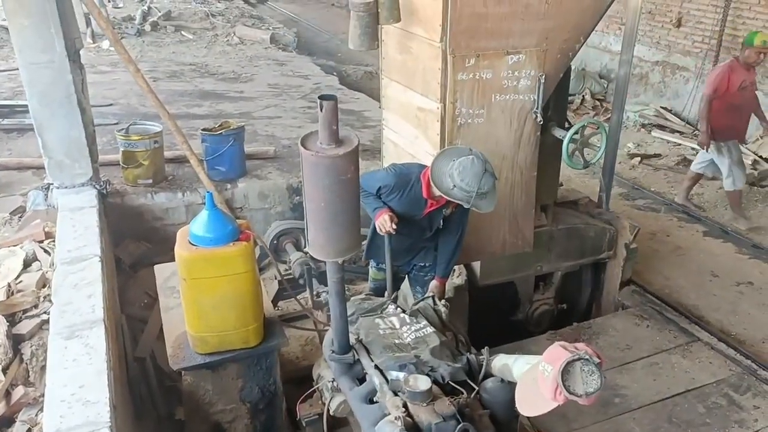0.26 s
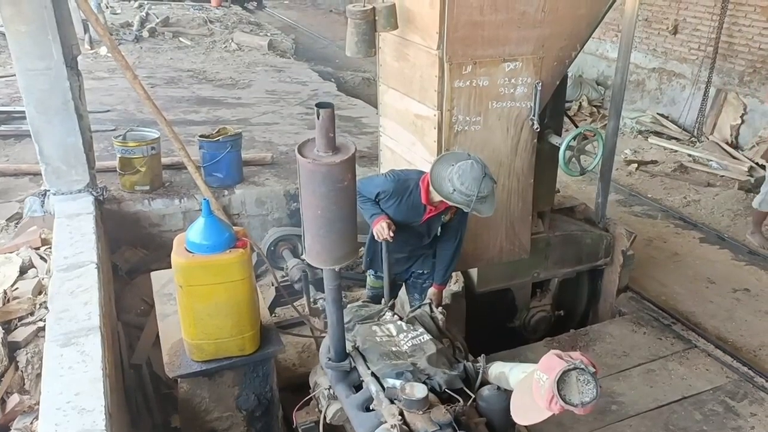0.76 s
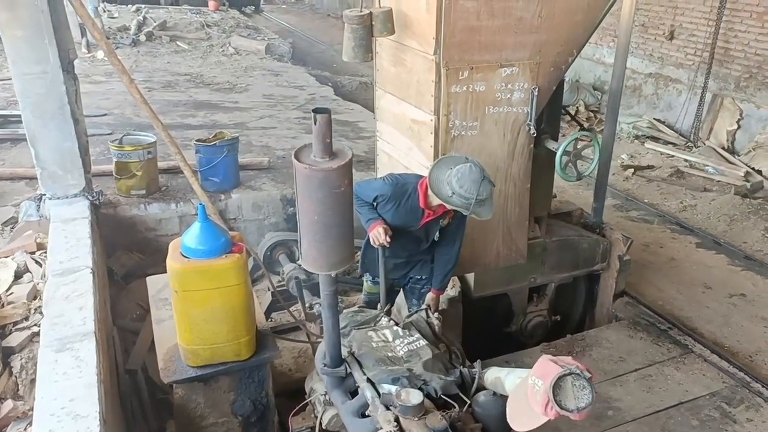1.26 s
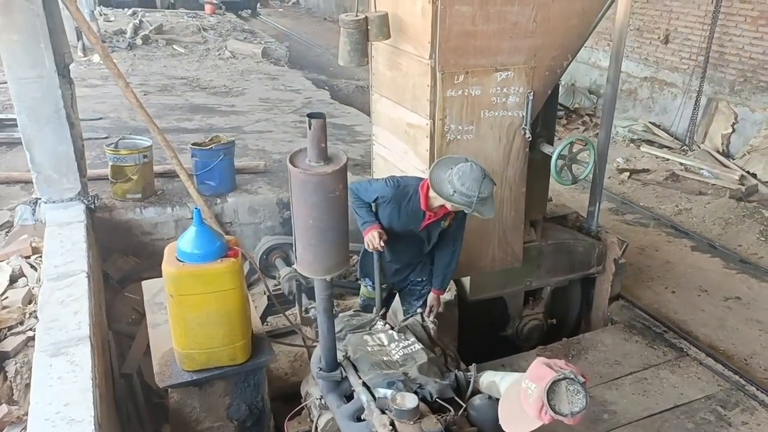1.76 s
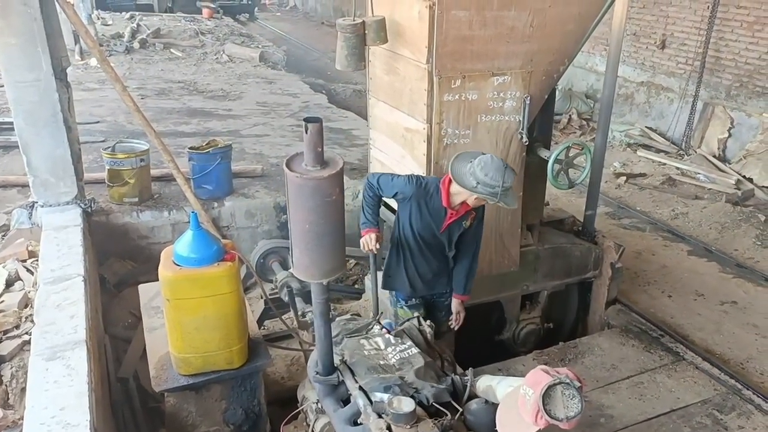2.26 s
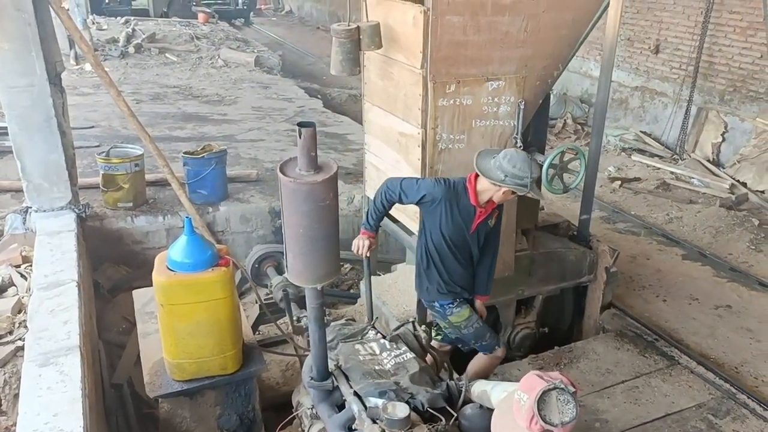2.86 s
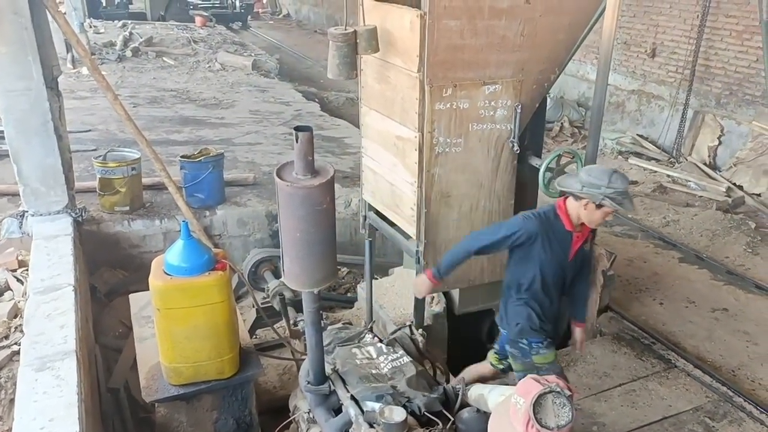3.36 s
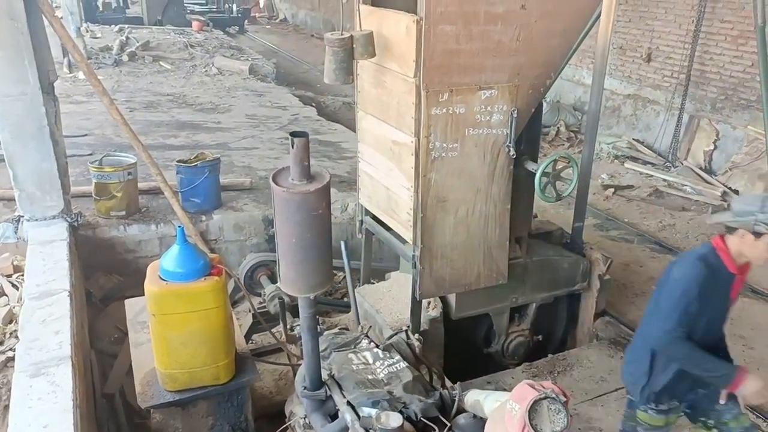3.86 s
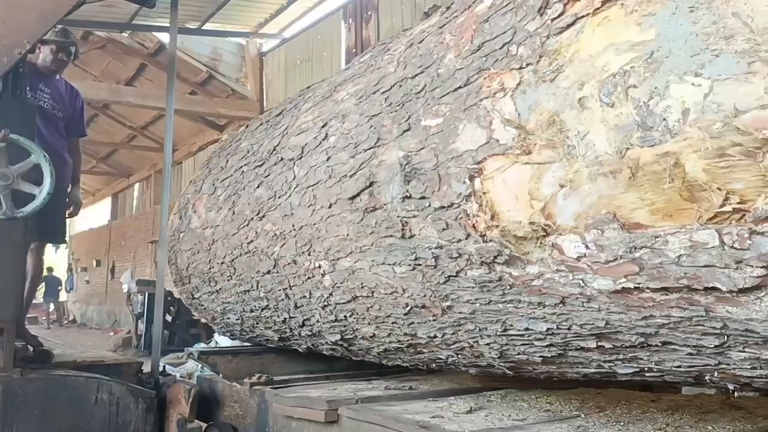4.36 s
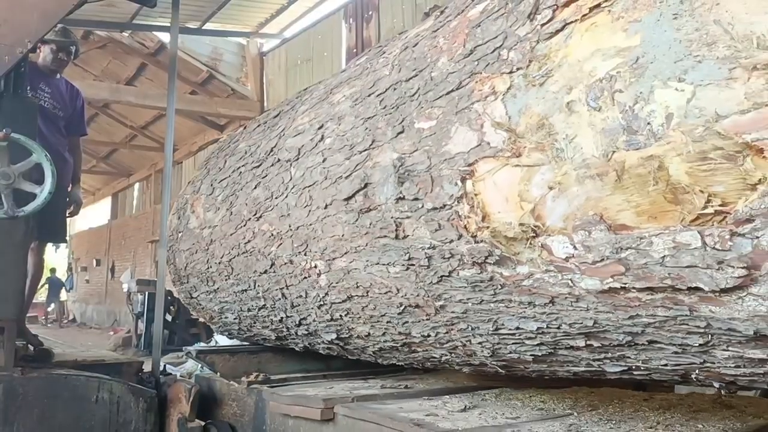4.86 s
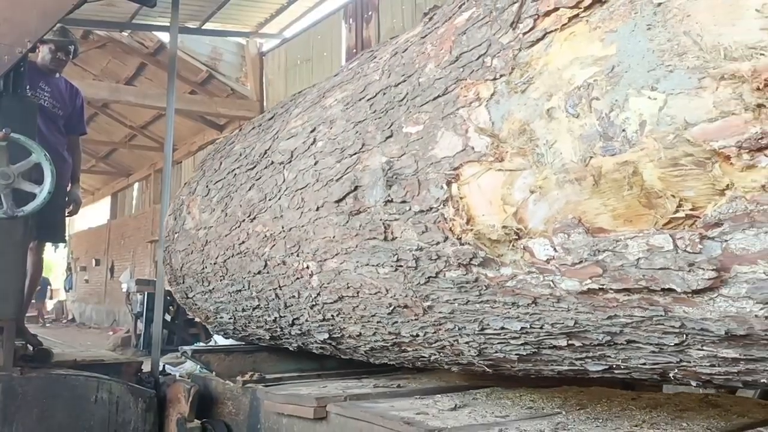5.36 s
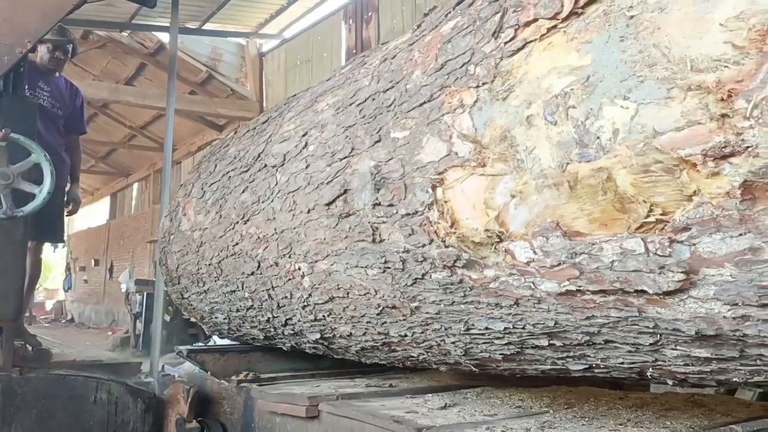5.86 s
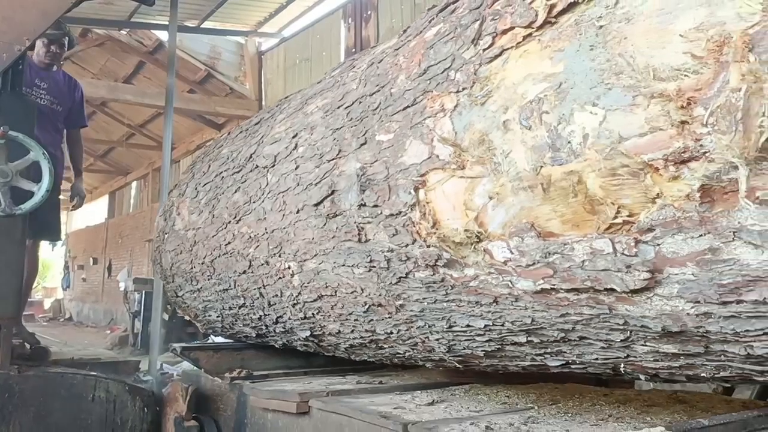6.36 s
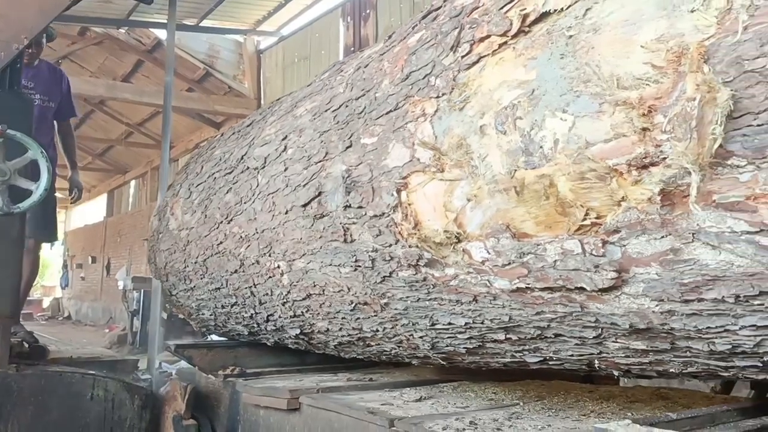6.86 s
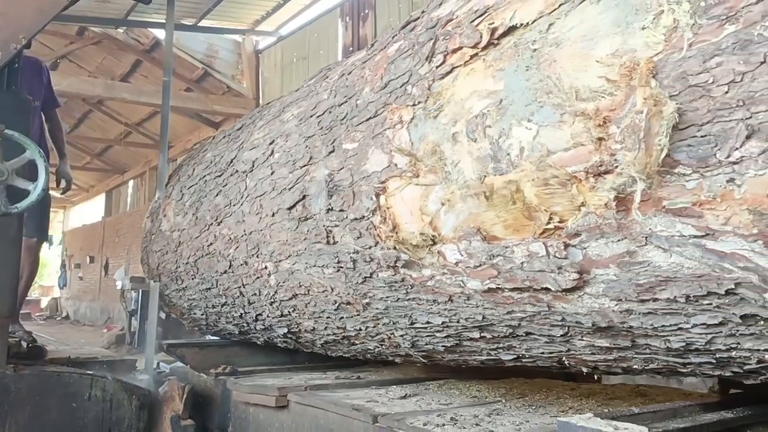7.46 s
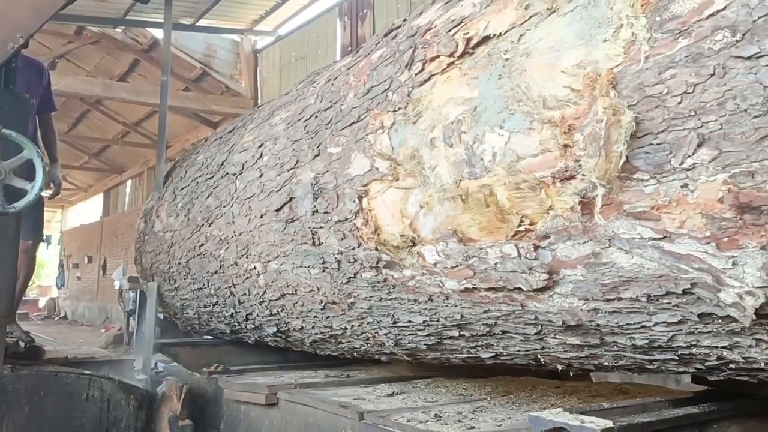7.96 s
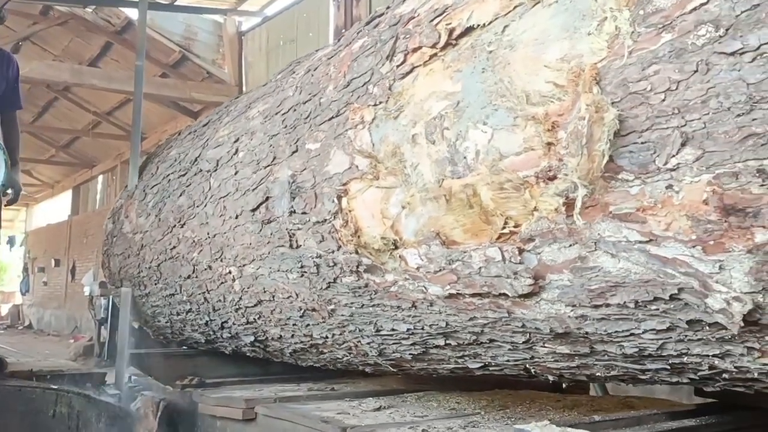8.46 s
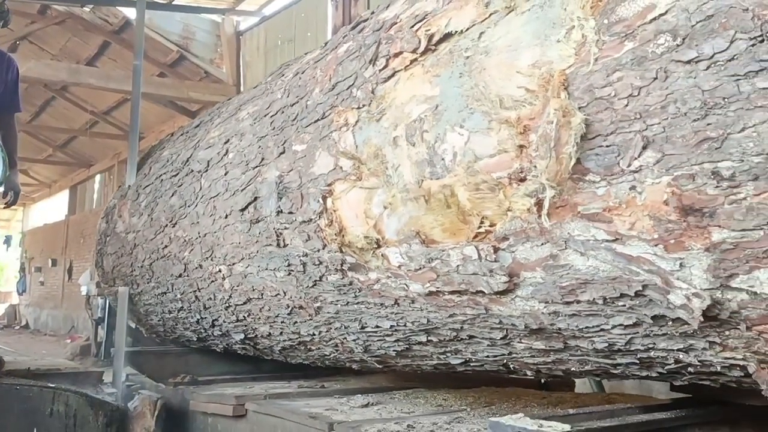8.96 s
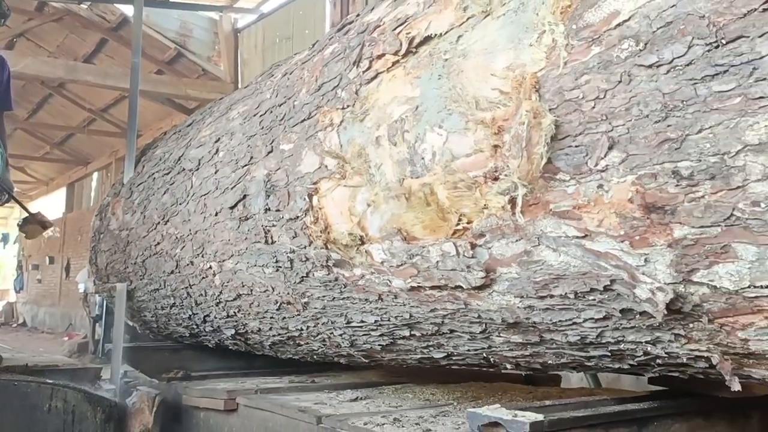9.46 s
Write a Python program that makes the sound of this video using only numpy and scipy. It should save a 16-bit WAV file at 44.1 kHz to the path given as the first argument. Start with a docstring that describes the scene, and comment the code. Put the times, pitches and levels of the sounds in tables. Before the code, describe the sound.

From 0 s a six-cylinder diesel idles very close, a smooth, fast exhaust throb of about 67 beats a second covered in hard metallic knocks, ticking valve gear and a rough roar. From about 1.5 to 2.7 s a slipping belt squeals near 3.8 kHz in tiny rapid chirps; the engine sags briefly around 2.2 s. At 2.5 s the throttle opens and the speed climbs to a harsher, blurred roar with fan hum until 4.5 s. A quick cut then places us by the log: the engine is steady, duller and across the shed, with belt-wheel hum and faint blade hiss. At 4.8 s teeth lightly brush bark. At 5.5 s the saw bites: a bright hiss flares, then settles and thickens, pulsing with passing teeth, with singing tones and short whines. A low, surging band drone grows to the end near 9.7 s as the engine slows slightly.

```python
"""A six-cylinder diesel drives a band saw in an open shed. Beside its silencer we first hear it idle: each
firing gives a smooth exhaust throb and a burst of ringing, noisy knocks. A thin metal part chirps in short
pulses, the engine sags, then it is throttled up and roars. Next we listen from the log carriage: the engine is
farther off, the band runs in air and brushes the bark. Then it bites: filtered noise makes the hiss, tones at
multiples of the tooth rate sing, the band drones, and the load pulls the speed down a little."""
import sys
import numpy as np
from scipy import signal
from scipy.fft import rfft, irfft, next_fast_len
from scipy.io import wavfile
from scipy.ndimage import uniform_filter1d, map_coordinates

SR = 44100
rng = np.random.default_rng(int(sys.argv[2]) if len(sys.argv) > 2 else 0)


def output_pcm(signal):
    """Save a mono or channel-first signal as 16-bit PCM at the path in sys.argv[1].

    Samples are clipped to [-1, 1] before scaling.
    """
    pcm = np.clip(np.atleast_2d(signal).T, -1, 1) * 32767
    wavfile.write(sys.argv[1], SR, np.round(pcm).astype(np.int16))


N = 427769
T = np.arange(N) / SR  # time of every sample, s

# Tones from unequal cylinders; the three idle-to-throttle levels are for beside the engine and the carriage:
# multiple of the four-stroke cycle, idle level/dB, throttled-up level/dB (both played 1 dB lower), carriage level/dB
UNEVEN_TONES = [(5, -39, -53, -53), (8, -47, -38, -43), (9, -41, -26.5, -38.5), (10, -42, -27.5, -42),
                (11, -41, -39, -50), (14, -36.5, -39, -55), (15, -36.5, -39, -42), (16, -35, -37, -41),
                (18, -33.5, -28.5, -42), (19, -46, -30, -47), (20, -40, -27.5, -41), (22, -37.5, -34, -53),
                (24, -32.5, -38, -48), (26, -45, -35, -44), (27, -50, -41, -40), (28, -58, -32, -45),
                (43, -50, -35, -54), (50, -39, -45, -50), (51, -55, -48, -45), (54, -35, -43, -51),
                (55, -37.5, -45, -52), (78, -40.5, -42, -55), (80, -38, -46, -58), (84, -41, -35, -53)]
# Strength of each cylinder's knock, in firing order: level/dB
CYLINDERS_DB = [.3, 1.2, -1.3, 0, 1.2, -.5]
# How alike the knocks are from cycle to cycle: f/Hz, share of the power that repeats
REPEATS = [(200, .03), (450, .36), (900, .42), (1400, .28), (3000, .08), (6000, .02)]
# Belt-driven fan beside the engine: multiple of the firing rate, idle level/dB, throttled-up level/dB
FAN_TONES = [(2.621, -43, -29), (7.863, -46, -37)]
# Hums heard at the carriage, the engine's fan (2.621) and the belt wheels: multiple of the firing rate, level
# before the cut/dB, change by the end/dB
WHEEL_TONES = [(2.621, -35.5, 1.5), (4.46, -36.5, -5.5), (5.87, -45.5, 8.5), (6.3, -50, 10),
               (8.5, -38, -10), (8.76, -42, 1), (10.1, -40, 2.5), (15.05, -42, -9)]

# Colour of each noise: f/Hz, level/dB (only the shape counts)
IDLE_SPECTRUM = [(200, -19), (500, -6), (900, -3.5), (1500, -11.5), (2400, -0.8), (3000, -4.5),
                 (3700, -6.5), (4600, -7), (6200, -10.5), (7200, -22.5), (9600, -12.5), (12000, -17),
                 (15500, -21.5)]  # knock at idle
RACING_SPECTRUM = [(400, -10), (900, 7), (1400, -3.5), (1800, 4), (2300, 2.5), (3000, -2.5), (4400, -6.5),
                   (6000, -9.5), (7200, -17), (9500, -12.5), (11200, -12), (13000, -20), (15500, -19)]  # knock at high speed
ROAR_SPECTRUM = [(25, -8), (90, 1), (170, 1), (250, 2.5), (370, -1.5), (470, 0.5), (600, 1.5), (1050, -2),
                 (1450, -6.5), (2200, -10), (3200, -11.5), (7000, -22), (11000, -24), (15500, -26)]  # roar of the shaken covers
TICK_SPECTRUM = [(1500, -30), (2400, -9), (2950, -12), (3500, 4), (3850, -2), (4200, -4), (4900, -13),
                 (7000, -20), (12000, -26)]  # valve gear
SHED_SPECTRUM = [(25, -22), (110, -8.5), (180, -9.5), (260, -12), (330, -10.5), (450, -8.5), (600, -10.5),
                 (930, -13), (1350, -17.5), (2100, -20), (3300, -22), (7000, -34), (9400, -34),
                 (15500, -52)]  # engine across the shed
KERF_SPECTRUM = [(900, 4.5), (1700, -1), (3000, 4.5), (4200, 2.5), (5600, -0.5), (6800, -4.5), (8600, -4),
                 (10200, 0.5), (12000, 0), (13000, -1.5), (14200, -8), (15500, -14)]  # hiss of the teeth
DRONE_SPECTRUM = [(25, -27), (60, -15), (105, -5.5), (150, -29), (182, -2), (210, 8), (230, 2), (255, -25),
                  (500, -49)]  # drone of the band

# Resonances: f/Hz, width/Hz, lift/dB
ROCKER_MODES = [(2320, 150, 1), (2560, 70, 2.5), (3150, 220, -4), (3380, 70, 4), (3380, 80, 3.5),
                (3630, 70, 6), (3810, 130, 4.5), (4150, 70, 2.5), (4300, 60, 6)]  # thin metal that rattles at idle
COVER_MODES = [(600, 50, 2.5), (870, 50, 2.5), (1200, 80, 4.5), (1764, 45, 5.5), (2320, 210, 5)]  # engine covers
FRAME_MODES = [(593, 27, 4.5), (1038, 70, 7), (1175, 70, -5), (1610, 44, 6.5), (1880, 310, 4.5),
               (2100, 88, 5.5), (8050, 140, 1)]  # engine heard at the carriage
BLADE_MODES = [(1890, 150, 7), (2093, 110, 8.4), (2900, 300, 2.7), (5660, 79, 2), (7950, 130, 4),
               (9700, 120, 5.5), (12950, 200, 3)]  # saw blade

# Stereo width, beside the engine and at the carriage: f/Hz, side-to-mid level/dB
NEAR_WIDTH = [(60, -10), (110, -19), (200, -13.5), (380, -12.5), (700, -8.5), (1290, -2.5), (2380, -2.5),
              (4400, -1.5), (8120, 0), (15000, 0.5)]
FAR_WIDTH = [(60, -27), (200, -33), (400, -9), (700, -1), (1300, -3), (3000, 0.5)]
# Stereo balance at the same two places: f/Hz, left-to-right level/dB
NEAR_LEAN = [(200, -1.5), (380, 2.5), (1290, -2.5), (2400, 1), (3600, -3.5), (5000, 0), (6200, -10.5),
             (7700, 5.5), (11000, 1), (13500, -8)]
FAR_LEAN = [(200, -0.5), (1290, -1), (2400, 2), (3200, -4.5), (4200, -4.5), (6200, -3), (7700, 11.5),
            (11000, 1), (13500, -6.5)]

# Pulsing chirp of a thin metal part that rattles, one short pulse per firing: t/s, level/dB
SQUEAL = [(0, -70), (1.45, -54), (1.6, -40), (2.1, -42), (2.2, -33.5), (2.42, -34), (2.56, -35.5),
          (2.68, -41), (2.78, -70)]
# Its loudest chirps: t/s, peak level/dB, f/Hz
CHIRPS = [(1.747, -25, 3790), (1.911, -28, 3820), (2.152, -24.5, 3790), (2.212, -26, 3950),
          (2.229, -26.5, 3970), (2.305, -25.5, 3820), (2.350, -24, 3840), (2.381, -25, 3830),
          (2.513, -27, 3860)]

# Singing teeth: multiple of the tooth rate, level against the hiss/dB (song then mixed lower), wait after bite t/s
TOOTH_TONES = [(4, -16, 1.5), (6, -17, .55), (7, -19, .55), (8, -17, .72), (9, -16, .33), (10, -20, .1),
               (11, -20, .25), (12, -20, .4), (17, -17, 0), (20, -20, .15), (21, -16.5, 0), (22, -20, 0),
               (23, -20, 0), (24, -23, 0), (25, -26, 0), (26, -24, 0), (28, -21, 0), (29, -26, 0)]
# Short whines on one tooth tone: t/s, multiple of the tooth rate, peak against the hiss/dB (mixed lower),
# half length t/s
WHINES = [(5.97, 9, -9, .09), (6.27, 8, -11, .08), (6.5, 8, -10.5, .12), (6.72, 9, -12, .1),
          (7.2, 4, -8, .08), (7.32, 8, -10, .15), (7.52, 9, -12, .14), (7.65, 4, -10, .1),
          (8.25, 8, -9.5, .09), (8.25, 4, -10, .18), (8.73, 8, -7, .11), (9.15, 8, -10.5, .2),
          (9.33, 4, -9, .1), (9.45, 9, -8.5, .17)]
# Stretches where the teeth stand proud: place after the weld/laps, lift/dB, half length/laps
PROUD = [(0, 3.7, .045), (.32, 1.6, .06), (.48, 2.9, .045), (.58, 1.3, .05), (.7, .8, .04)]
# Surges of the band's drone: t/s, peak level/dB, half length t/s, f/Hz, glide/(Hz per s)
SURGES = [(6.4, -36, .075, 186, 92), (6.6, -35, .12, 213, 0), (6.86, -33, .06, 206, 62),
          (7.38, -32, .14, 212, -18), (7.53, -30, .06, 215, 40), (7.79, -25.5, .07, 207, 99),
          (7.86, -30, .09, 180, 0), (8.16, -31.5, .1, 180, -4), (8.33, -29, .08, 211, 181),
          (8.6, -31, .13, 180, 0), (8.7, -31, .1, 214, -40), (8.92, -29.5, .1, 213, 0),
          (9.22, -30.5, .09, 178, -22), (9.4, -27.5, .1, 208, 48), (9.62, -27.5, .07, 218, 39)]

JUMP_S, JUMP_FADE_S = 4.475, 0.039  # when we move from engine to carriage; length of the crossfade
# engine speed in firings per second: idle, the goal of the open throttle, at the carriage before the cut
IDLE_HZ, OPEN_HZ, SAWING_HZ = 67.25, 78.7, 70.3
SAG_HZ, DROOP_HZ = 2.3, 1.65  # speed lost taking up the belt, and in the full cut
BELT_S, SAG_S = 2.2, .15  # middle of the sag, and its half length
THROTTLE_S, SPIN_UP_S = 2.48, 1.0  # the throttle opens; the lag with which the flywheel follows
# the firing tone is loudest at one speed and falls away on both sides
TUNED_HZ, THROB_DB, DETUNE_DB_PER_HZ = 69.7, -14, 0.57
# its octave fades with speed, and steeply once the silencer starts to block it
OCTAVE_DB, OCTAVE_DB_PER_HZ, BLOCKED_HZ, BLOCKED_DB_PER_HZ = -15.5, 0.46, 74.5, 2
CRACK_S = .025  # crack that opens a knock: time to fall 60 dB
# levels beside the engine, before the rise that comes with the throttle
IDLE_KNOCK_DB, RACING_KNOCK_DB, KNOCK_RISE_DB = -23, -21, 2
ROAR_DB, ROAR_RISE_DB = -19, 1.7
# valve gear at idle: level, time for a tick to fall 60 dB at idle speed, scatter of strength
TICK_DB, TICK_T60_S, TICK_SCATTER_DB = -34, .022, 2.0
# metal rattle: pitch, half length of a chirp, depth of flutter, fast and slow pitch scatter
SQUEAL_HZ, CHIRP_S, SQUEAL_FLUTTER_DB = 3830, .006, 2.5
SQUEAL_JITTER_HZ, SQUEAL_DRIFT_HZ = 50, 15
# engine at the carriage: levels before the cut, and how far and how fast they dip at the bite
FAR_THROB_DB, THROB_DIP_DB = -23, 1
FAR_DIN_DB, DIN_DIP_DB, DIP_S = -21.5, 4, 0.21
FREE_BLADE_DB = -36  # the band running in air
GRAZE_S, GRAZE_LENGTH_S, GRAZE_DB = 4.8, 0.054, -33  # teeth brush the bark: moment, half length, level
# the cut: the teeth bite, the hiss flares and settles, and the kerf reaches its full depth
BITE_S, BITE_ATTACK_S, SETTLE_S, DEEPEN_S = 5.49, 0.09, 0.78, 2.6
HISS_DB, FLARE_DB = -28, 5  # settled level, and the flare above it
TEETH_PER_FIRING, TEETH_ON_BAND = 6.703, 140
WELD_S = 7.412  # a moment when the weld passes
SING_RISE_S, SING_FADE_DB, SING_FADES_PER_S = .12, 1.5, 5
CATCH_DB, CATCH_S = 5.5, .45  # extra level as a tone catches, and the lag with which it settles
DRONE_DB, DRONE_DB_PER_S = -33, 0.77  # level up to the bite, and its growth afterwards
TOP_HZ = 15500  # microphone band limit


def amp(db):
    """Turn decibels into gain."""
    return 10 ** (np.asarray(db) / 20)


def unit(x):
    """Scale to an rms of 1."""
    return x / np.sqrt(np.mean(x ** 2) + 1e-20)


def along(points, hz):
    """Read a (frequency, value) table on a log frequency axis."""
    f, v = np.transpose(points)
    return np.interp(np.log(hz + 1), np.log(f + 1), v)


def wobble(rate, size=64):
    """A smooth random curve with rate knots a second."""
    knots = rng.standard_normal(int(N * rate / SR) + 4)
    coarse_t = T[::size]
    return np.interp(T, coarse_t, map_coordinates(knots, [coarse_t * rate]))


def swell(at_s, half_s):
    """A smooth rise to 1 and fall around one moment."""
    return np.exp(-((T - at_s) / half_s) ** 2)


def approach(start_s, lag_s):
    """From 0 toward 1, quickly at first, after a start time."""
    return 1 - np.exp(-np.maximum(T - start_s, 0) / lag_s)


def filtered(x, response):
    """Shape x by a gain that depends on frequency."""
    m = next_fast_len(N + 8192)
    return irfft(rfft(x, m) * response(np.fft.rfftfreq(m, 1 / SR)), m)[..., :N]


def body(x, spectrum, modes, width, lean):
    """Pass two noises through a resonant body as mid and side; the final mid has rms 1."""
    def colour(hz):
        lift = sum(db / (1 + (2 * (hz - f) / w) ** 2) for f, w, db in modes)
        mid_and_side = np.array([np.ones_like(hz), amp(along(width, hz))])
        return amp(along(spectrum, hz) + lift) * mid_and_side

    mid, side = filtered(x, colour)
    left_right = np.array([mid + side, mid - side])
    pair = filtered(left_right, lambda hz: amp(np.outer([.5, -.5], along(lean, hz))))
    return pair / np.std(pair.mean(axis=0))


def patchy(x, depth_db, size=7):
    """Narrow bands flare and fade at random for some tens of milliseconds."""
    z = signal.stft(x, nperseg=1024)[2]
    field = uniform_filter1d(rng.standard_normal(z.shape[1:]), size=3, axis=0)  # smooth over frequency
    field = uniform_filter1d(field, size=size, axis=1)  # smooth over time
    return signal.istft(z * amp(depth_db * unit(field)), nperseg=1024)[1][:, :N]


def off_axis(pair, left_lead_s):
    """Sound from one side reaches one microphone first."""
    return filtered(pair, lambda hz: np.exp(1j * np.pi * left_lead_s * np.outer([1, -1], hz)))


def tone(turns, waver):
    """A sine of rms 1 whose phase wanders a little."""
    return np.sqrt(2) * np.sin(2 * np.pi * (turns + rng.random()) + waver * wobble(9))


def glides(rows, waver_hz):
    """Short tones that swell and fade while their pitch slides and wavers."""
    out = np.zeros(N)
    for s, db, half_s, hz, slide in rows:
        on = abs(T - s) < 3 * half_s
        since = T[on] - s
        turns = np.cumsum(hz + slide * since + waver_hz[on]) / SR + rng.random()
        out[on] += amp(db) * np.exp(-(since / half_s) ** 2) * np.sqrt(2) * np.sin(2 * np.pi * turns)
    return out


def kerf_depth():
    """0 to 1 as the blade works into the rounded end of the log."""
    return np.sin(np.pi / 2 * np.clip((T - BITE_S) / DEEPEN_S, 0, 1))


def engine_speed():
    """Firings per second: idle, a sag under the belt, the run-up, then a droop that follows the cut's depth."""
    sag = SAG_HZ * swell(BELT_S, SAG_S)
    run_up = (OPEN_HZ - IDLE_HZ) * approach(THROTTLE_S, SPIN_UP_S)
    return np.where(T < JUMP_S, IDLE_HZ - sag + run_up, SAWING_HZ - DROOP_HZ * kerf_depth())


def exhaust(firings, first_db, octave_db, rough):
    """One smooth pressure dip per firing: the silencer passes just the first two harmonics."""
    puffs = amp(first_db) * np.cos(2 * np.pi * firings)
    puffs += amp(octave_db) * np.cos(4 * np.pi * firings)
    return -np.sqrt(2) * puffs * (1 + rough * wobble(30))


def lope(firings, levels_db, waver, count=6):
    """Unequal cylinders add unsteady tones at multiples of the whole engine cycle."""
    out = np.zeros(N)
    for row, db in zip(UNEVEN_TONES, levels_db):
        out += amp(db + 2.4 * wobble(14)) * tone(firings * row[0] / count, waver)
    return out


def fan_hum(firings, throttle):
    """The belt-driven fan hums at fixed ratios to the engine and grows louder with the throttle."""
    out = np.zeros(N)
    for ratio, idle, fast in FAN_TONES:
        level_db = idle + throttle * (fast - idle) + 1.1 * wobble(6.3)
        out += amp(level_db) * tone(firings * ratio, waver=0.92)
    return out


def knocks(firings, ring_s, scatter_s, size_db, rise_s, crack=0, count=6):
    """Each firing sets off its cylinder's own ring, the same every cycle, plus a fresh burst of noise."""
    at_s = np.interp(np.arange(int(firings[-1]) + 1), firings, T)
    at_s = at_s + scatter_s * rng.standard_normal(len(at_s))
    at = np.clip(np.round(at_s * SR).astype(int), 0, N - 1)
    size = amp(np.resize(CYLINDERS_DB, len(at)) + size_db * rng.standard_normal(len(at)))
    tail_t = T[:4096]
    decay = amp(-60 * tail_t / ring_s) * (1 - np.exp(-tail_t / rise_s))
    decay = np.hypot(decay, crack * amp(-60 * tail_t / CRACK_S))

    def ring(blows, tail):
        # the rings wrap around, so the engine is already running at the start
        return signal.oaconvolve(np.pad(blows, (len(tail) - 1, 0), "wrap"), tail, "valid")

    blows = np.array([np.bincount(at[c::count], size[c::count], N) for c in range(count)])
    rings = np.zeros((2, N))
    for channel in range(2):
        for cylinder in blows:
            rings[channel] += ring(cylinder, decay * rng.standard_normal(len(decay)))
    burst_level = np.sqrt(abs(ring(blows.sum(axis=0) ** 2, decay ** 2)))
    bursts = burst_level * rng.standard_normal((2, N))
    repeating = filtered(unit(rings), lambda hz: np.sqrt(along(REPEATS, hz)))
    return repeating + filtered(unit(bursts), lambda hz: np.sqrt(1 - along(REPEATS, hz)))


def diesel_knock(firings, throttle):
    """Hard knocks at idle give way to blurred ones at speed, harsher around two kilohertz with more fuel."""
    hard = knocks(firings, ring_s=.22, scatter_s=.00002, size_db=.5, rise_s=.005, crack=1.45)
    idling = body(patchy(hard, depth_db=2.5), IDLE_SPECTRUM, ROCKER_MODES, NEAR_WIDTH, NEAR_LEAN)
    blurred = knocks(firings, ring_s=.24, scatter_s=.00003, size_db=.6, rise_s=.005, crack=1.1)
    racing = body(patchy(blurred, depth_db=1.5), RACING_SPECTRUM, [], NEAR_WIDTH, NEAR_LEAN)
    mix = (1 - throttle) ** 0.67 * amp(IDLE_KNOCK_DB) * idling
    mix += throttle ** 0.77 * amp(RACING_KNOCK_DB) * racing
    return amp(KNOCK_RISE_DB * throttle) * mix


def cover_roar(firings, throttle):
    """Every firing also shakes the covers, whose resonances colour a roar."""
    blast = knocks(firings, ring_s=.14, scatter_s=.00002, size_db=.5, rise_s=.003, crack=1.0)
    roar = body(blast, ROAR_SPECTRUM, COVER_MODES, NEAR_WIDTH, NEAR_LEAN)
    return amp(ROAR_DB + ROAR_RISE_DB * throttle) * roar


def valve_gear(firings):
    """Loose tappets tick once a firing, some harder than others."""
    beat = firings.astype(int)
    count = beat[-1] + 1
    size_db = np.resize(CYLINDERS_DB, count) + TICK_SCATTER_DB * rng.standard_normal(count)
    decay = amp(-60 * (firings - beat) / IDLE_HZ / TICK_T60_S)
    ticks = amp(size_db)[beat] * decay * rng.standard_normal((2, N))
    return amp(TICK_DB) * body(ticks, TICK_SPECTRUM, ROCKER_MODES, NEAR_WIDTH, NEAR_LEAN)


def beside_engine(speed, firings):
    """Add up throb, fan, knock, ticks and roar; the throttle is judged from the speed."""
    throttle = np.clip((speed - 69) / 7, 0, 1)
    first_db = THROB_DB - DETUNE_DB_PER_HZ * abs(speed - TUNED_HZ)
    octave_db = OCTAVE_DB - OCTAVE_DB_PER_HZ * (speed - IDLE_HZ)
    octave_db -= BLOCKED_DB_PER_HZ * np.maximum(speed - BLOCKED_HZ, 0)
    throb = exhaust(firings, first_db, octave_db, rough=0.053)
    lope_db = [idle + throttle * (fast - idle) - 1 for _, idle, fast, _ in UNEVEN_TONES]
    throb += lope(firings, lope_db, waver=0.59)
    ticks = (1 - throttle) * valve_gear(firings)
    noise = diesel_knock(firings, throttle) + cover_roar(firings, throttle)
    return throb + fan_hum(firings, throttle) + ticks + noise


def metal_chirps(firings):
    """A thin metal part rings briefly with each jerk of the crankshaft; the hardest rattles stand out as
    chirps."""
    waver_hz = SQUEAL_JITTER_HZ * wobble(170) + SQUEAL_DRIFT_HZ * wobble(12)
    beat = firings.astype(int)
    strength = amp(SQUEAL_FLUTTER_DB * rng.standard_normal(beat[-1] + 1))[beat]
    slips = strength * np.cos(np.pi * firings) ** 4  # one pulse per firing
    squeal = unit(slips * np.sin(2 * np.pi * np.cumsum(SQUEAL_HZ + waver_hz) / SR))
    chirps = glides([(s, db, CHIRP_S, hz, 0) for s, db, hz in CHIRPS], waver_hz)
    return amp(np.interp(T, *np.transpose(SQUEAL))) * squeal + chirps


def wheel_hum(firings):
    """The engine's fan and the belt wheels hum at fixed ratios to the engine, and their levels drift through
    the cut."""
    progress = np.clip((T - BITE_S) / (T[-1] - BITE_S), 0, 1)
    out = np.zeros(N)
    for ratio, db, change in WHEEL_TONES:
        out += amp(db + change * progress + 1.5 * wobble(9)) * tone(firings * ratio, waver=1.22)
    return out


def distant_engine(firings):
    """The engine across the shed: longer rings for the smearing roof, with the hum of its fan and the belt
    wheels."""
    dip = approach(BITE_S, DIP_S)
    first_db = FAR_THROB_DB - THROB_DIP_DB * dip
    throb = exhaust(firings, first_db, first_db - 9.5, rough=0.031)
    throb += lope(firings, [row[3] for row in UNEVEN_TONES], waver=0.55)
    echoing = knocks(firings, ring_s=0.34, scatter_s=.00003, size_db=0.4, rise_s=0.0044)
    din = body(patchy(echoing, depth_db=1.0), SHED_SPECTRUM, FRAME_MODES, FAR_WIDTH, FAR_LEAN)
    din = amp(FAR_DIN_DB - DIN_DIP_DB * dip) * din
    return off_axis(throb + wheel_hum(firings) + din, left_lead_s=0.000462)


def band_drone():
    """The band's free length drones as low noise that grows during the cut, with gliding surges."""
    noise = patchy(rng.standard_normal((2, N)), depth_db=1.0)
    drone = body(noise, DRONE_SPECTRUM, [], FAR_WIDTH, FAR_LEAN)
    drone_db = DRONE_DB + DRONE_DB_PER_S * np.maximum(T - BITE_S, 0)
    surges = glides(SURGES, waver_hz=4 * wobble(25)) * unit(amp(1.2 * wobble(32)))
    return off_axis(amp(drone_db) * drone + surges, left_lead_s=0.00025)


def tooth_song(teeth):
    """Passing teeth sing at multiples of their rate; each tone comes and goes, some swell into short whines."""
    # the band slips slightly on its wheels, which blurs the high tones most
    slip = 0.012 * wobble(14) + 0.007 * wobble(50)
    mean_rate_hz = teeth[-1] / T[-1]
    song = np.zeros((2, N))
    for k, db, wait_s in TOOTH_TONES:
        start_s = BITE_S + wait_s
        lean = amp(np.array([[.5], [-.5]]) * along(FAR_LEAN, k * mean_rate_hz))
        fades = unit(amp(SING_FADE_DB * wobble(SING_FADES_PER_S) + 2.6 * wobble(16)))
        singing = np.clip((T - start_s) / SING_RISE_S, 0, 1) * fades
        # only tones that wait for a while start with a catch
        catch_db = CATCH_DB * (1 - approach(start_s, CATCH_S)) * (wait_s > 0)
        whine = sum(amp(peak) * swell(s, half_s) for s, multiple, peak, half_s in WHINES if multiple == k)
        whine = whine * unit(amp(2 * wobble(20)))
        level = np.hypot(amp(db + catch_db) * singing, whine)
        song += lean / lean.mean() * level * tone(k * (teeth + slip), waver=0.55)
    return song


def proud_teeth(laps):
    """Lift of the hiss (dB) as the same proud stretches of the band come round on every lap."""
    place = laps - np.interp(WELD_S, T, laps)
    lift_db = np.zeros(N)
    for at, db, half in PROUD:
        distance = (place - at + .5) % 1 - .5
        lift_db += db * np.exp(-(distance / half) ** 2)
    return lift_db


def band_saw(firings):
    """The band runs in air, brushes the bark, then rasps through the log while its free length drones."""
    contact = np.clip((T - BITE_S) / BITE_ATTACK_S, 0, 1)
    in_wood = amp(HISS_DB + FLARE_DB * (1 - approach(BITE_S, SETTLE_S)))
    in_air = amp(FREE_BLADE_DB) + amp(GRAZE_DB) * swell(GRAZE_S, GRAZE_LENGTH_S)
    force = contact * in_wood + (1 - contact) * in_air
    level = force * amp(0.22 * wobble(25))
    teeth = firings * TEETH_PER_FIRING
    noise = patchy(rng.standard_normal((2, N)), depth_db=2.0)
    hiss = body(noise, KERF_SPECTRUM, BLADE_MODES, FAR_WIDTH, FAR_LEAN)
    cutting = hiss + amp(-3.5) * tooth_song(teeth)
    # proud teeth spit out mostly treble
    spit = amp(contact * proud_teeth(teeth / TEETH_ON_BAND))
    spit_change = spit / spit[T > BITE_S].mean() - 1
    cutting += contact * spit_change * filtered(cutting, lambda hz: 1 - .7 / (1 + (hz / 6000) ** 4))
    # the first shallow bite is thin; the lower rasp grows as the kerf deepens
    lower_rasp = filtered(cutting, lambda hz: 1 / (1 + (hz / 5000) ** 4))
    cutting -= 0.56 * (1 - kerf_depth()) ** 2 * lower_rasp
    return level * cutting + band_drone()


def scene():
    """One crankshaft times the whole machine; the two listening points meet in a short fade."""
    speed = engine_speed()
    firings = np.cumsum(speed) / SR
    moved = np.clip((T - JUMP_S) / JUMP_FADE_S + .5, 0, 1)
    near = off_axis(beside_engine(speed, firings), left_lead_s=-.0001) + metal_chirps(firings)
    far = distant_engine(firings) + band_saw(firings)
    return np.sqrt(1 - moved) * near + np.sqrt(moved) * far


def record(dry):
    """The microphone rounds off the highest peaks and keeps nothing above its band limit."""
    rounded = dry / (1 + abs(dry) ** 8) ** (1 / 8)
    return filtered(rounded, lambda hz: hz < TOP_HZ)


dry = scene()
out = record(dry)
output_pcm(out)
```